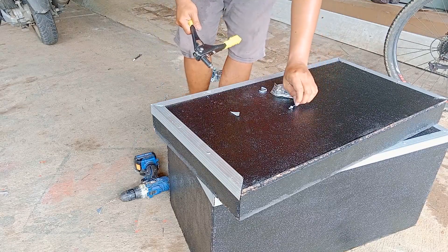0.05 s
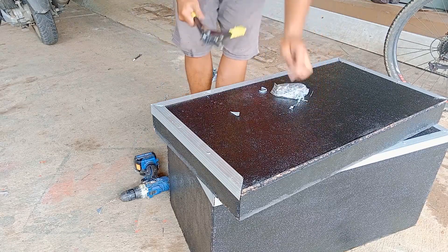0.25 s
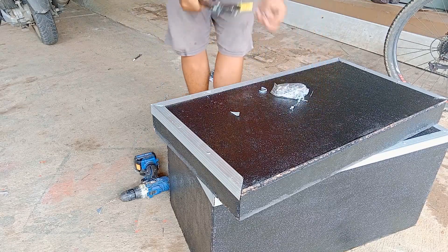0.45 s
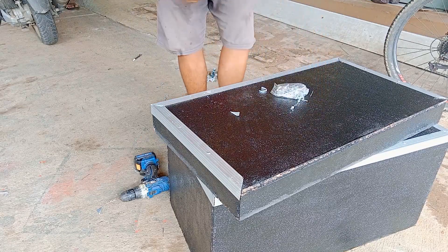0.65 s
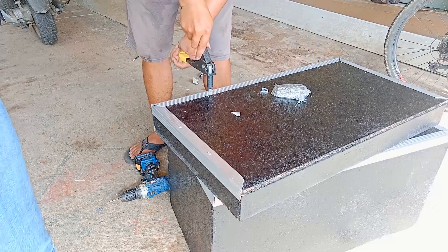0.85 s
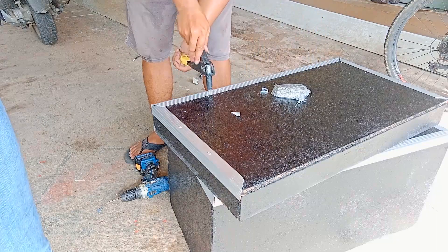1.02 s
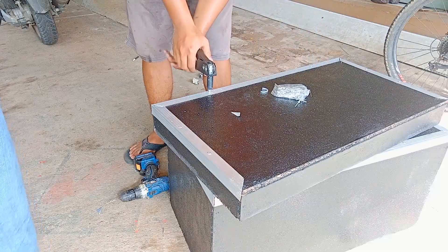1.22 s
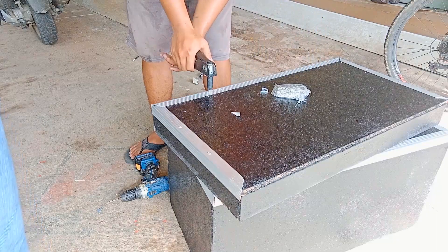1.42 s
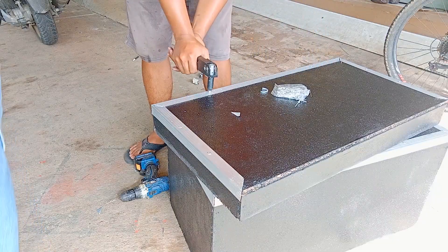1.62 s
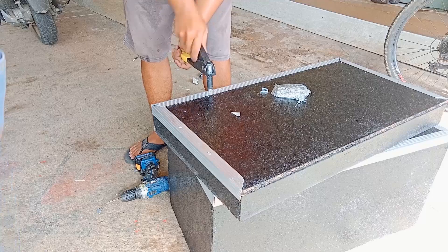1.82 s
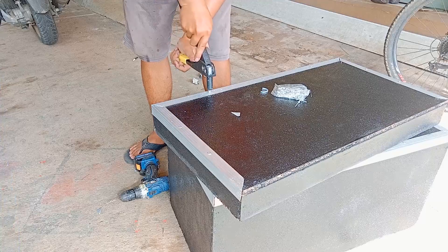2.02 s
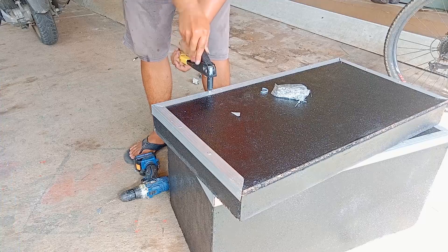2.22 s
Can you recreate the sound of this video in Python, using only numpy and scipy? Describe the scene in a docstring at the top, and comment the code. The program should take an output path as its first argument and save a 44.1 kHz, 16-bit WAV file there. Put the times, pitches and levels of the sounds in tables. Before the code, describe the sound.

A hand riveter works on a hollow case: loose lid knocks and a rivet clink, harder knocks, scraping into the hole, a creak and clack, then a bright steel snap; close microphone in a quiet open workshop.

```python
"""A dry tick and loose lid knocks come first, then a rivet clinks into the nose of a hand riveter.
The nose scrapes into its hole on the hollow case; squeezed, the rivet creaks and gives with a clack.
The handles spring open with a bright steel snap and a small squeak, over low workshop air.
Coloured noise bursts make the blows and drive decaying modes; random slips make the scrapes;
wavering sines make the squeaks, and shaped noise the air."""
import sys
import numpy as np
from scipy import signal
from scipy.fft import rfft, irfft
from scipy.io import wavfile
from scipy.ndimage import uniform_filter1d

SR = 44100
rng = np.random.default_rng(int(sys.argv[2]) if len(sys.argv) > 2 else 0)


def inscribe(sig):
    """Save sig as 16-bit PCM at rate SR to the path in sys.argv[1].

    A 1-D sig is mono; a 2-D sig holds one channel per row.
    Samples are clipped to [-1, 1] before scaling.
    """
    pcm = np.round(np.clip(np.atleast_2d(sig).T, -1, 1) * 32767)
    wavfile.write(sys.argv[1], SR, pcm.astype(np.int16))


N = 99225  # samples, 2.25 s
SIZE = 32768  # samples in one burst or room tail

# frequencies at which the blows on the case are voiced: [Hz]
KNOCK_HZ = [140, 260, 750, 2000, 9000]
# knocks on the case: (time [s], rattle length [s], then level [dB] at each of KNOCK_HZ)
KNOCKS = [(0.022, 0.027, 19, 19, 11, 3.5, -21.5), (0.04, 0.25, 25.5, 20, 12, -12, -28),
          (0.2034, 0.016, 24, 21, 16.5, 18.5, -17), (.361, 0.029, 24, 10.5, 8, -5, -21),
          (0.4056, 0.02, 32, 27, 21.5, 16.5, -6), (0.4476, 0.012, 26.5, 17.5, 24, 8, -7),
          (0.476, 0.0053, 30.5, 34.5, 29, 19.5, 7), (.479, 0.028, 34.5, 41.5, 29.5, 16.5, 0),
          (.737, 0.019, 30, 22, 17.5, 3, -5), (0.766, 0.016, 2, 16, 19.5, 4.5, -10.5),
          (.781, 0.12, 13.5, 24.5, 19, 6, -29), (.884, 0.027, 20.5, 18.5, 17, 6, -12),
          (1.1734, 0.0062, -24, -18, 2, 9.5, -20.5), (1.233, 0.014, 21.5, 15.5, -1.5, 6, -21.5),
          (1.513, 0.035, 14, 23.5, 24, 14.5, -5.5), (1.531, 0.013, 22, 22, 24, 17, -23),
          (1.574, 0.014, 27.5, 18, 20, 2, -24), (1.6713, 0.011, 19, 21, 30.5, 21.5, 1.5),
          (1.6768, 0.0055, 21, 20.5, 31, 16.5, -0.5), (1.700, 0.075, 24.5, 17.5, 15.5, 8, -12.5),
          (1.735, 0.071, -24, 15.5, 14.5, 4, -25), (1.858, 0.005, -14, -13, 6, -13, -22)]
# frequencies at which the steel parts are voiced: [Hz]
CLICK_HZ = [900, 3000, 9000]
# steel clicks of the riveter: (time [s], rattle length [s], then level [dB] at each of CLICK_HZ)
CLICKS = [(.399, 0.019, -2, 1, -11.5), (1.898, 0.024, -14.5, 1.3, -21), (1.9237, 0.0087, 2, 6.2, -7.5),
          (1.932, 0.0085, -9, 3.1, -12), (1.9412, 0.0044, -13, 9.8, -13), (1.949, 0.013, 9, 12, -6),
          (1.9555, 0.0055, 12, 18.3, 10.5), (1.9572, 0.0038, 24.5, 17.1, 8.5),
          (2.1765, 0.017, -24, 3.1, -2.5), (2.181, 0.0033, -2, 7.7, -24.5)]
# rivet going into the nose: (time [s], rattle length [s], then level [dB] at each of CLICK_HZ)
CLINKS = [(.174, 0.018, -1, 0, -12.5), (.197, 0.012, -10, 3, -2), (.204, 0.0044, 1, 9.5, -1)]
# small dry ticks: (time [s], then level [dB] at each of CLICK_HZ)
TICKS = [(.010, 9, -9.5, -20), (1.3079, -6, 3.5, -18.5), (1.488, 14, -5, -17), (1.852, -17, -9, -16),
         (1.903, -6, 6.5, -18.5)]
# frequencies at which the scrapes are voiced: [Hz]
SCRAPE_HZ = [300, 1000, 3000, 9000]
# scrapes of nose and jaws, and sudden noisy swells at 0.582 s and 1.076 s: (start [s], rise [s], 20 dB fall
# [s], then level [dB] at each of SCRAPE_HZ)
SCRAPES = [(0.582, 0.013, 0.11, 11, 17, 13.5, 4), (.699, 0.009, 0.15, 22, 18, 5, -6.5),
           (1.076, 0.041, 0.31, 11, -10, -7, -16.5), (1.432, 0.018, 0.24, 14.5, 3.5, -5.5, -25),
           (2.104, 0.017, 0.42, -26, 5, 0, -11)]
# squeaks of dry steel: (start [s], length [s], first pitch [Hz], last pitch [Hz], relative level [dB])
SQUEAKS = [(0.665, 0.074, 7420, 7940, -45), (1.125, 0.067, 845, 852, -49),
           (2.126, 0.014, 7200, 7270, -46.5)]
# modes of the case panels: (frequency [Hz], relative level [dB], t60 [s])
CASE_MODES = [(231, -6, .22), (143, -12, .3), (564, -2, .3), (634, -8, .3), (752, -3, .2), (1022, -4, .35),
              (1062, -6, .3), (1227, -8, .3), (1434, -9, .25), (1562, -4, .28)]
# modes of the riveter: (frequency [Hz], relative level [dB], t60 [s])
TOOL_MODES = [(900, -4.5, 0.16), (2050, -7, 0.3), (2370, -30, 0.16), (2770, -12, 0.21), (3930, -10, 0.06),
              (4030, -25, 0.28)]
# modes of the rivet in the open nose: (frequency [Hz], relative level [dB], t60 [s])
CLINK_MODES = [(1080, 18, .2), (1180, 3, .1), (3052, 1.5, 0.05)]
# mode of the air in the case: (frequency [Hz], relative level [dB], t60 [s])
CAVITY_MODES = [(443.5, 0.99, 0.67)]
# how strongly the lid drives that air, most as the nose is pushed home: (time [s], level [dB])
CAVITY_DRIVE = [(.68, -2.5), (.78, 11), (1.1, -0.5)]
# broad colour of the case: (frequency [Hz], relative level [dB])
CASE_COLOUR = [(35, -35), (75, -24), (125, -3), (285, -2.5), (340, -11), (420, -5), (720, -5.5),
               (900, -8.5), (1600, -4.5), (3400, -4), (5600, -12.5), (7000, -14), (8500, -2), (11800, -25),
               (15000, -18)]
# broad colour of the steel parts: (frequency [Hz], relative level [dB])
TOOL_COLOUR = [(100, -60), (500, -29), (850, -2), (1300, -13.5), (2000, -3), (3900, -3.5), (5600, -12),
               (8500, -2.5), (11800, -15.5), (15000, -8)]
# broad colour of the scrapes: (frequency [Hz], relative level [dB])
SCRAPE_COLOUR = [(40, -28), (200, -4), (600, -5.5), (3800, -1), (5800, -6.5), (8500, -4), (11800, -13),
                 (15000, -8.5)]
# late workshop reverberation: (frequency [Hz], t60 [s])
ROOM_T60 = [(120, 0.98), (600, 0.25), (4000, 0.52), (9000, 0.33), (15000, 0.41)]
# spectrum of the workshop air: (frequency [Hz], relative level [dB])
AIR = [(25, -61), (55, -3.5), (100, 2.5), (420, -11), (1000, -12.5), (3000, -18.5), (5500, -37.5),
       (8500, -38), (12000, -51), (16000, -41)]

# bursts: part of the length spent swelling, unevenness, length scale over which the tick fades
SWELL_SHARE, CLUMP_DB, TICK_LENGTH_S = 0.164, 5, 0.023
CASE_TICK_DB, TOOL_TICK_DB = -3.5, -9.5
BASS_SLOWNESS, BASS_HZ = 1.93, 295  # bass of the case lasts longer by this factor
TICK_RATTLE_S = 0.0023
SLIPS_PER_S, SLIP_SPREAD_DB = 2500, 3.5
SQUEAK_WAVER = 0.035  # rms, as a fraction of the pitch
# ringing: faint long part per source, then the quick first drop that all share
CASE_RING_DB, TOOL_RING_DB = -17, -13.5
DAMPED_DB, DAMPED_T60_S = -19, 0.036
CASE_WANDER = 0.013  # rms, as a fraction of the pitch
EARLY_PANEL_DB = -1.5  # panel drive before the noisy swell at 0.58 s
RING_STOP_S, RING_STOP_T60_S = 1.865, 0.031  # the case ring stops short
EARLY_T60_S, ROOM_DELAY_S, ROOM_RISE_S, EARLY_DB = 0.16, 0.0043, 0.0017, 5.5
CASE_WET_DB, TOOL_WET_DB, SCRAPE_WET_DB, SQUEAK_WET_DB, TICK_WET_DB = -10.5, -7, -15, -6.5, -10
AIR_DB = -50  # rms
KNEE, CEILING = .6, .9  # amplitude where rounding starts, and its limit
EDGE_HZ = 15800


def amp(db):
    """Decibels to gain."""
    return 10 ** (np.asarray(db) / 20)


def unit(x):
    """Scales to an energy of one."""
    return x / np.sqrt(np.sum(x ** 2) + 1e-20)


def read(points, hz):
    """Reads a table on a log-frequency axis."""
    f, value = np.transpose(points)
    return np.interp(np.log(hz + 1), np.log(f + 1), value)


def fade(t, t60):
    """Falls by 60 dB in t60 seconds."""
    return amp(-60 * t / np.maximum(t60, 1e-4))


def add(mix, s, sound):
    """Adds a sound to the mix at a time in seconds."""
    part = mix[max(round(s * SR), 0):][:len(sound)]
    part += sound[:len(part)]


def coloured(x, *tables):
    """Causal filter that gives a burst the broad spectrum of the summed tables."""
    hz = np.fft.rfftfreq(SIZE, 1 / SR)
    spectrum = rfft(x, SIZE)
    own = np.sqrt(np.abs(uniform_filter1d(abs(spectrum) ** 2, size=150)) + 1e-12)
    log_gain = np.log(amp(sum(read(p, hz) for p in tables)) / own)
    # the Hilbert transform of the log gain gives the minimum phase
    circle = np.concatenate([log_gain, log_gain[-2:0:-1]])
    response = np.exp(np.conj(signal.hilbert(circle)))[:len(hz)]
    return irfft(spectrum * response)


def blow(length, tick_db, slowness=1):
    """A clumped rattle swells, then falls 20 dB per length; short ones start with a stronger tick."""
    t = np.arange(SIZE) / SR
    clumps = uniform_filter1d(rng.standard_normal(SIZE), size=70)
    noise = rng.standard_normal(SIZE) * amp(CLUMP_DB * np.tanh(clumps / clumps.std()))
    noise *= np.minimum(t / (SWELL_SHARE * length), 1)
    bass = signal.sosfilt(signal.butter(2, BASS_HZ, fs=SR, output="sos"), noise)
    decay = amp(-20 * t / length)
    slow_decay = amp(-20 * t / (length * slowness))
    body = unit(noise * decay + bass * (slow_decay - decay))
    body[0] += amp(tick_db) * np.exp(-length / TICK_LENGTH_S)
    return body


def ringing(x, modes, ring_db, wander=0):
    """Driven modes drop quickly, then ring on faintly and unevenly; loose contact makes pitch wander."""
    out = np.zeros(N)
    for hz, db, t60 in modes:
        slow_noise = uniform_filter1d(rng.standard_normal((2, N)), size=700)
        drift, grip = uniform_filter1d(slow_noise, size=300)
        uneven = 1 + np.tanh(grip / grip.std()) / 2
        pitch = hz * (1 + wander * drift / drift.std())
        turn = np.exp(2j * np.pi * np.cumsum(pitch) / SR)
        for part_db, part_t60 in (ring_db, t60), (DAMPED_DB, DAMPED_T60_S):
            r = fade(1 / SR, part_t60)  # decay per sample
            level = amp(db + part_db) * np.sqrt(hz / 1000 * (1 - r * r) / 2)
            # a leaky sum in a frame turning at the mode's pitch
            mode = (turn * signal.lfilter([1], [1, -r], x / turn)).real
            out += uneven * level * mode
    return out


def room(x, wet_db):
    """Quick reflections from floor and walls, with a longer diffuse tail."""
    t = np.arange(SIZE) / SR
    hz, when, z = signal.stft(rng.choice([-1., 1.], SIZE), SR, nperseg=256)
    t60 = read(ROOM_T60, hz)[:, None]
    late = signal.istft(z * fade(when, t60) / np.sqrt(t60), SR, nperseg=256)[1][:SIZE]
    early = rng.choice([-1., 1.], SIZE) * fade(t, EARLY_T60_S)
    onset = np.clip((t - ROOM_DELAY_S) / ROOM_RISE_S, 0, 1)
    tail = unit(late * onset) + amp(EARLY_DB) * unit(early * onset)
    return x + amp(wet_db) * signal.fftconvolve(x, tail)[:len(x)]


def case():
    """The lid and its trim are knocked: rattling noise bursts with a slower bass."""
    out = np.zeros(N)
    for s, length, *levels in KNOCKS:
        burst = blow(length, CASE_TICK_DB, BASS_SLOWNESS)
        hit = coloured(burst, CASE_COLOUR, list(zip(KNOCK_HZ, levels)))
        add(out, s, room(hit, CASE_WET_DB))
    return out


def scrapes():
    """Dense tiny slips, as random impulses under each stroke: the scrapes of metal on metal, and two sudden
    noisy swells."""
    out, t = np.zeros(N), np.arange(SIZE) / SR
    for s, rise, fall, *levels in SCRAPES:
        slips = (rng.random(SIZE) < SLIPS_PER_S / SR) * rng.choice([-1., 1.], SIZE)
        slips *= amp(SLIP_SPREAD_DB * np.minimum(rng.exponential(1, SIZE), 3))
        stroke = np.minimum(t / rise, 1) * amp(-20 * np.maximum(t - rise, 0) / fall)
        scrape = coloured(slips * stroke, SCRAPE_COLOUR, list(zip(SCRAPE_HZ, levels)))
        add(out, s, room(scrape, SCRAPE_WET_DB))
    return out


def hollow_case(x):
    """Knocks and scrapes ring the panels and the air inside, until they stop short."""
    t = np.arange(N) / SR
    before_scrape = t < SCRAPES[0][0]
    panels = ringing(x * amp(EARLY_PANEL_DB * before_scrape), CASE_MODES, CASE_RING_DB, CASE_WANDER)
    lid_push = amp(np.interp(t, *np.transpose(CAVITY_DRIVE)))
    cavity = ringing(x * lid_push, CAVITY_MODES, CASE_RING_DB)
    return x + (panels + cavity) * fade(np.maximum(t - RING_STOP_S, 0), RING_STOP_T60_S)


def steel(hits, modes):
    """Small steel parts strike each other: short bright bursts set their modes ringing."""
    out = np.zeros(N)
    for s, length, *levels in hits:
        hit = coloured(blow(length, TOOL_TICK_DB), TOOL_COLOUR, list(zip(CLICK_HZ, levels)))
        add(out, s, room(hit, TOOL_WET_DB))
    return out + ringing(out, modes, TOOL_RING_DB)


def ticks():
    """Tiny dry ticks: very short steel-coloured bursts without modes."""
    out = np.zeros(N)
    for s, *levels in TICKS:
        burst = blow(TICK_RATTLE_S, TOOL_TICK_DB)
        tick = coloured(burst, TOOL_COLOUR, list(zip(CLICK_HZ, levels)))
        add(out, s, room(tick, TICK_WET_DB))
    return out


def squeaks():
    """Short wavering, chattering tones where dry steel sticks and slips."""
    out = np.zeros(N)
    for s, length, first_hz, last_hz, db in SQUEAKS:
        u = np.linspace(0, 1, int(length * SR))
        noise = rng.standard_normal((2, SIZE))
        waver, grip = uniform_filter1d(noise, size=int(10 * SR / first_hz))[:, :len(u)]
        glide = first_hz + (last_hz - first_hz) * u
        hz = glide * (1 + SQUEAK_WAVER * waver / waver.std())
        chatter = np.sin(np.pi * u) * abs(grip) / grip.std()
        add(out, s, 2 * amp(db) * chatter * np.sin(2 * np.pi * np.cumsum(hz) / SR))
    return room(out, SQUEAK_WET_DB)


def air():
    """Low steady background of the open workshop, as noise with a shaped spectrum."""
    shape = amp(read(AIR, np.fft.rfftfreq(N, 1 / SR)))
    noise = irfft(rfft(rng.standard_normal(N)) * shape, N)
    return amp(AIR_DB) * np.sqrt(N) * unit(noise)


def scene():
    """All sources at one microphone."""
    lid = hollow_case(case() + scrapes())
    riveter = steel(CLICKS, TOOL_MODES)
    rivet = steel(CLINKS, CLINK_MODES)
    return (lid + riveter + rivet + ticks() + squeaks() + air())[None]


def record(dry):
    """The loudest peaks are rounded off; then the treble is cut at the band edge."""
    span = CEILING - KNEE
    over = np.maximum(abs(dry) - KNEE, 0)
    soft = np.clip(dry, -KNEE, KNEE) + np.sign(dry) * span * np.tanh(over / span)
    lowpass = signal.firwin(511, EDGE_HZ, window=("kaiser", 9), fs=SR)
    return signal.oaconvolve(soft, lowpass[None], "same")


dry = scene()
out = record(dry)
inscribe(out)
```